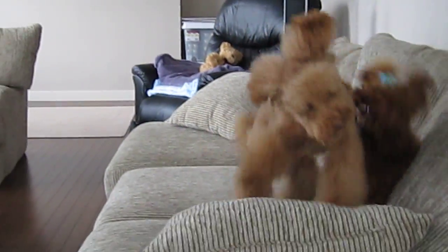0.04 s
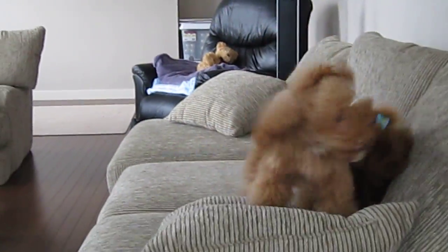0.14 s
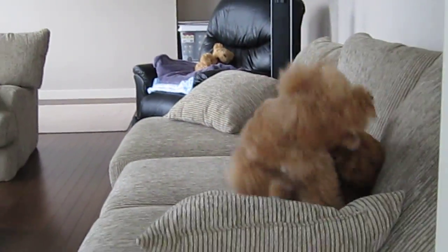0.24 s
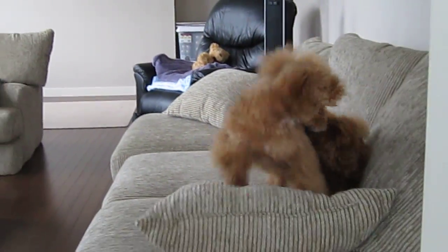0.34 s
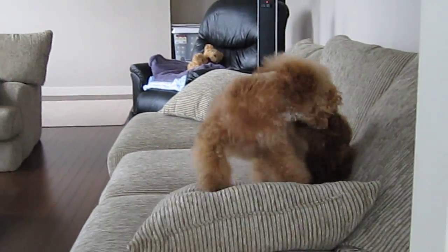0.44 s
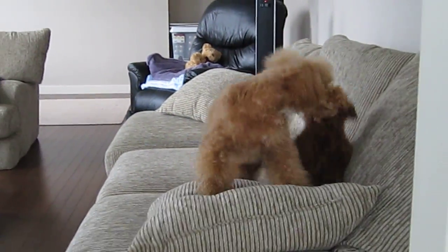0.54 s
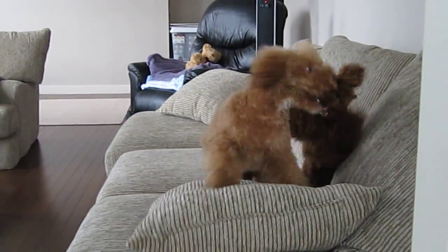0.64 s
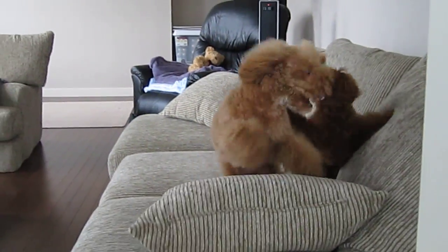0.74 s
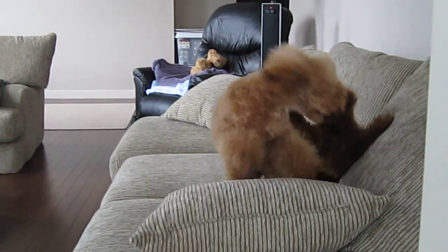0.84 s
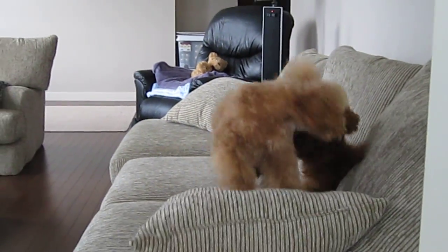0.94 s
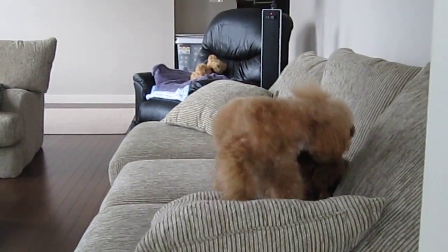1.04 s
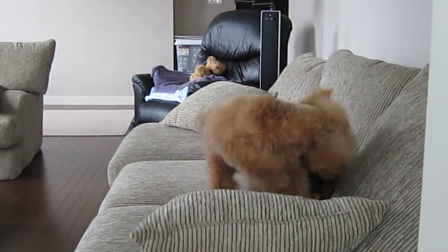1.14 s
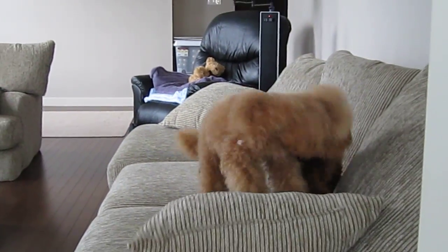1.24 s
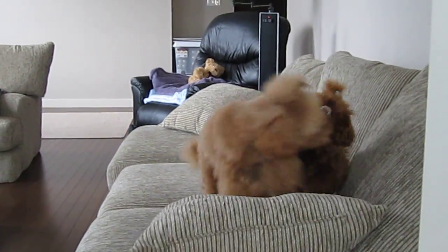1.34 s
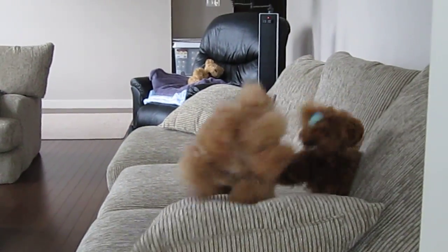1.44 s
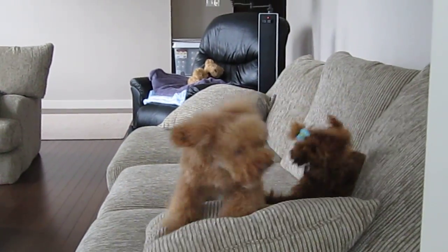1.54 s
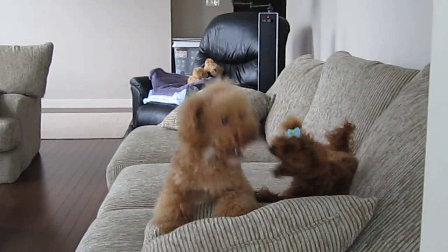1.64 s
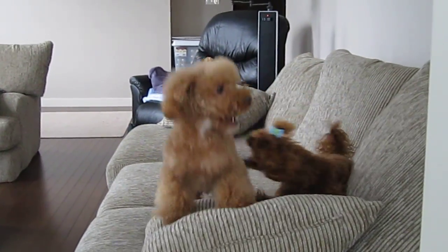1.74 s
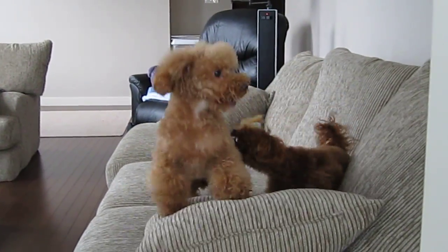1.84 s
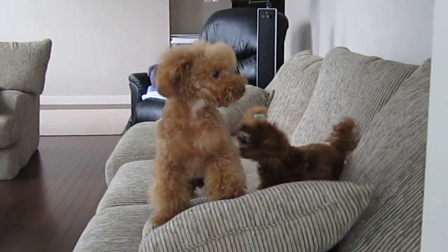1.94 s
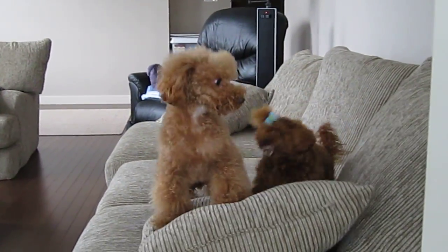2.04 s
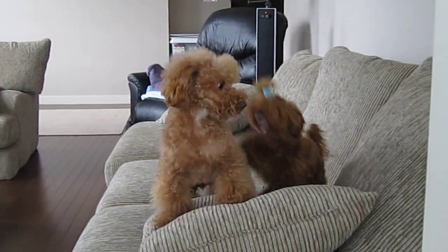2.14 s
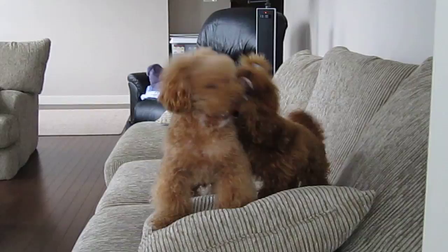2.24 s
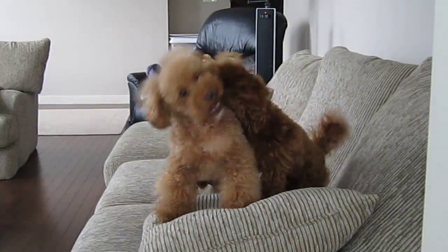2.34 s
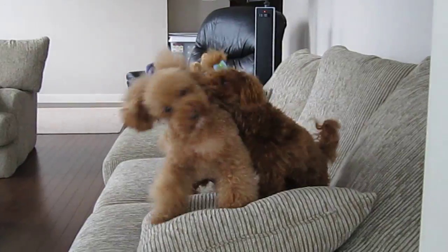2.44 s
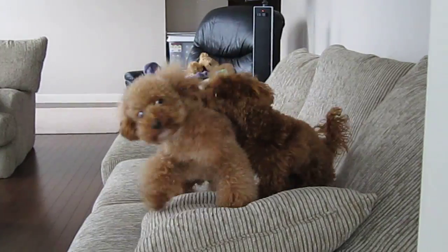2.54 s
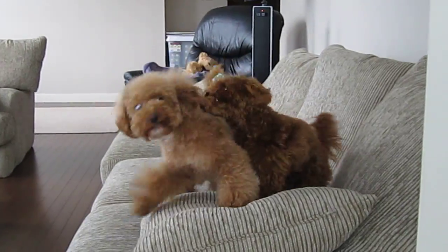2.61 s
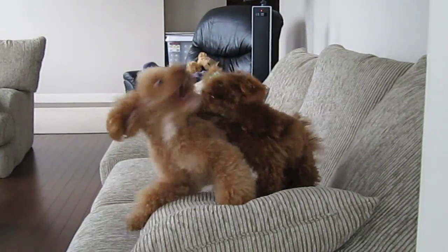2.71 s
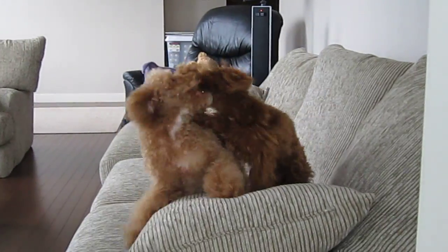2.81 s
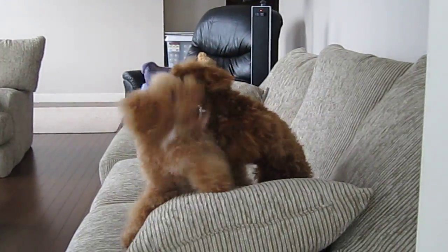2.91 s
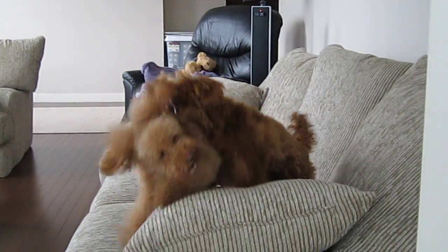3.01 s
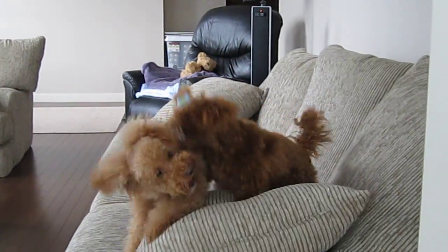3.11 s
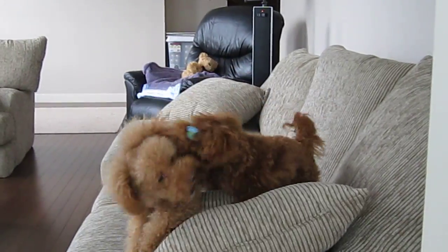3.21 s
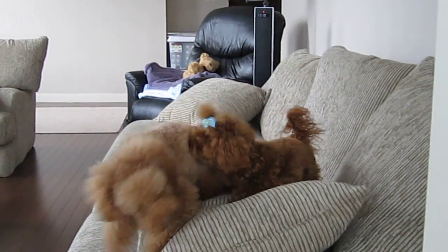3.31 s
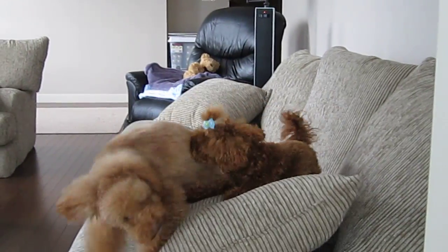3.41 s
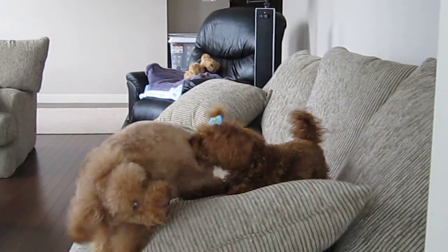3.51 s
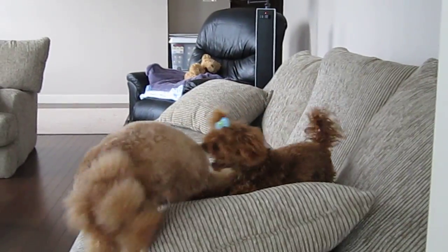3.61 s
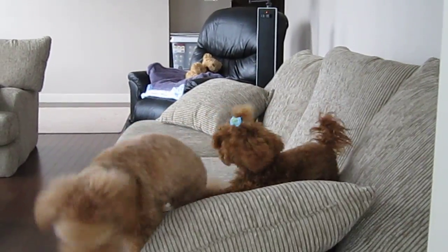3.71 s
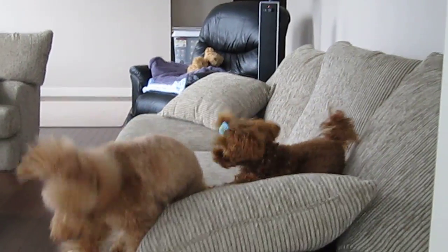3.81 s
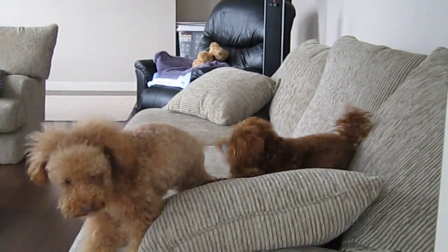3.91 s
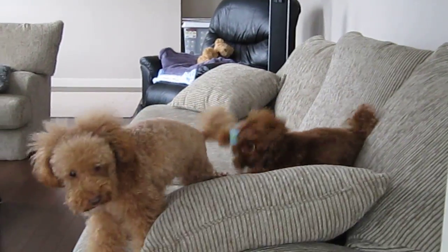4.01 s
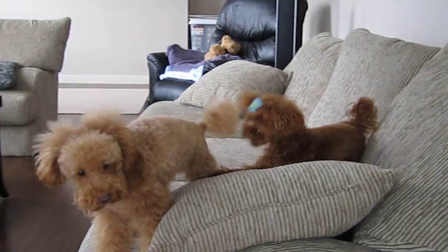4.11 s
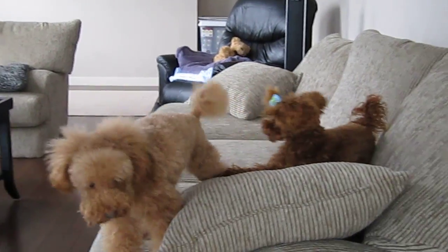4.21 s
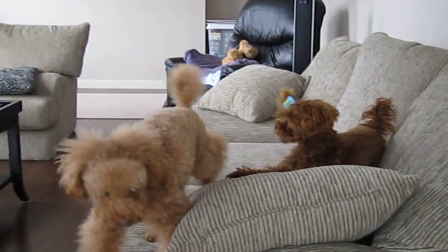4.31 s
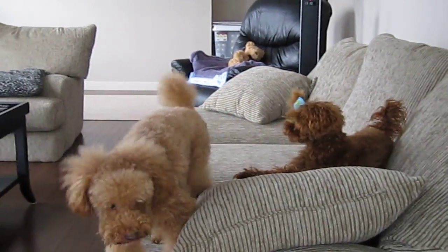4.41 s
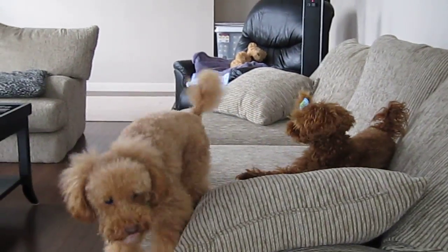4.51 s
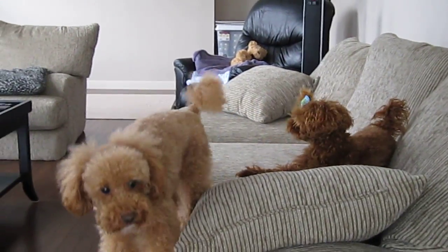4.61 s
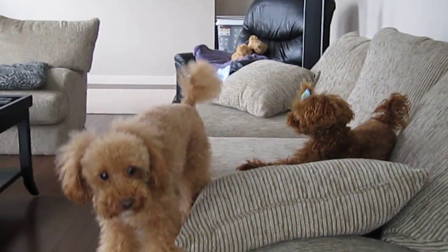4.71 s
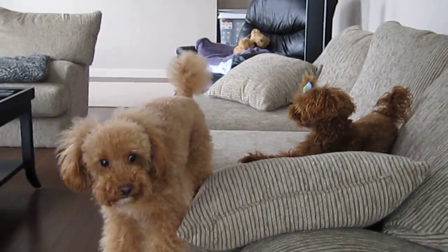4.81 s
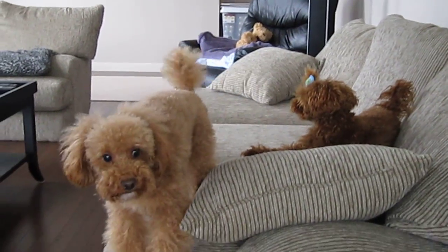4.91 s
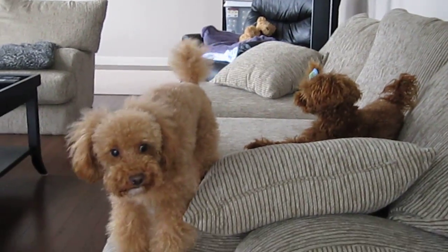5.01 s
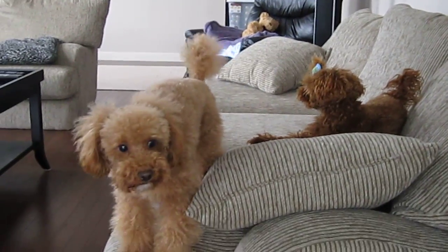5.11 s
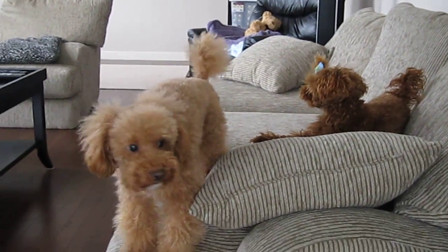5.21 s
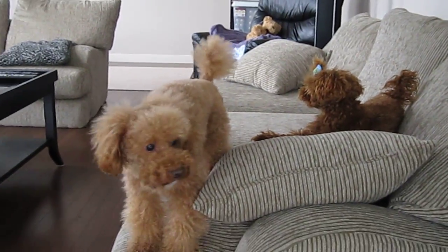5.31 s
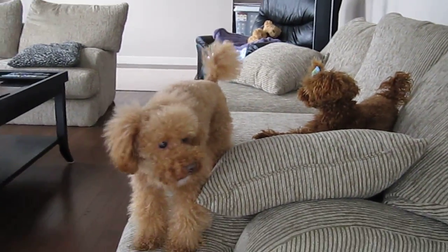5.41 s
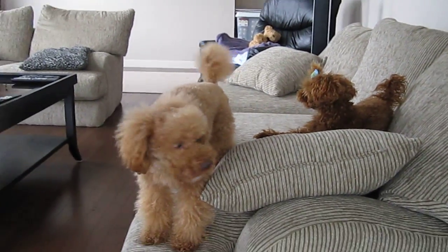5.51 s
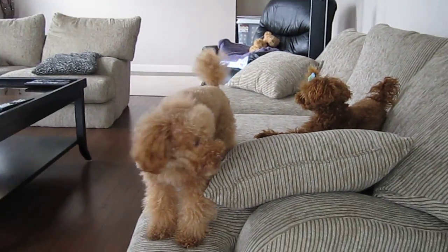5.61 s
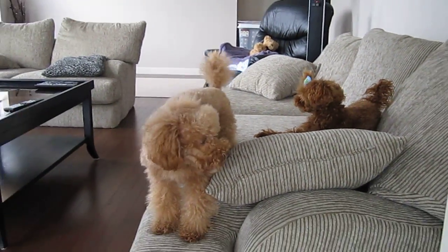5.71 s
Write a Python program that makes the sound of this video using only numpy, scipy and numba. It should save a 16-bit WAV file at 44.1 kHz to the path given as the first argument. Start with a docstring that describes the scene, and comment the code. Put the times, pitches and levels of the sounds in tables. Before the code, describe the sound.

Small dogs play-fight on a cushioned sofa in a moderately ringing living room, heard in mono from a couple of metres, over a low steady rumble. At 0 s a hard, flapping snort with a nose puff and dull thud starts abruptly. From 0.5 to 0.9 s a rough, airy growl cracks into a short higher whine near 0.8. A stronger growl runs from 1.1 to 1.5, with a tooth-like click and a short growl straight after, ending in a loud rattling snort and palate slaps around 1.6. From 2 to 2.4 come faint puffs and tiny clicks. A brief grunt at 2.5 leads to a breathy snort, then a loud raspy snarl from 3.0 to 3.4. A clipped growl and snort land at 3.65, with a trailing puff near 3.9. Sparse faint clicks follow around 4.2 to 4.5, then near quiet until weak snuffles and soft cushion bumps at 5.5 to 5.7.

```python
"""Growls in rough bursts from two small dogs play-fighting on a sofa, a couple of metres from the microphone.
Uneven pulses and air through a moving mouth make the growls, which crack into short whines. Chopped noise makes
rattling snorts and hissing nose puffs; the palate slaps. Damped noise bursts click like teeth, lips and claws
and thud on the cushions. The living room rings, over a low steady rumble of filtered noise."""
import sys
import numpy as np
from scipy import signal
from scipy.fft import rfft, irfft, next_fast_len
from scipy.io import wavfile
from scipy.ndimage import uniform_filter1d, map_coordinates
from numba import njit

SR = 44100
rng = np.random.default_rng(int(sys.argv[2]) if len(sys.argv) > 2 else 0)


def unload_wav(signal):
    """Save mono or channel-first audio to the path in sys.argv[1] as 16-bit WAV at rate SR, clipped to [-1, 1]."""
    wavfile.write(
        sys.argv[1],
        SR,
        np.round(np.clip(np.atleast_2d(signal).T, -1, 1) * 32767).astype(np.int16),
    )


N = 253575
T = np.arange(N) / SR

# Event levels below are before each source's own trim, the room and the microphone.
# growls: start [t/s], length [t/s], attack [t/s], time to bare the teeth [t/s],
#   pitch at start and end before wander [f/Hz], fundamental at start and end [level/dB],
#   mouth [level/dB], snarl [level/dB], swell of mouth and snarl [level/dB], extra effort in mid-growl [level/dB],
#   roughness at start and end [0-1], lip resonance when open [f/Hz], jaw resonance at start and end [f/Hz]
GROWLS = [ (0.509, 0.37, 0.023, 0.2, 237.6, 272.6, -35.5, -34, -34, -39.5, 1, 0.3, 0.67, 0.4, 3740, 1320, 960),
          (1.122, 0.38, 0.039, 0.045, 285, 273.1, -34, -29.5, -29.5, -39.5, -3.5, -3, 0.72, 0.9, 3000, 1180, 1340),
          (1.48, 0.173, 0.017, 0.055, 281.8, 255.4, -29, -34.5, -27.5, -27, -0.5, 1.5, 0.28, 0.2, 3260, 1240, 1460),
          (2.472, 0.1, 0.0054, 0.025, 249.8, 239, -35.5, -37, -38.5, -41.5, -5.5, 0.5, 0.35, 0.4, 2900, 1160, 1100),
          (2.986, 0.42, 0.042, 0.02, 284.2, 277.2, -31, -25, -25, -33.5, 0, 0.16, 0.6, 0.46, 3410, 1170, 1015),
          (3.631, 0.066, 0.015, 0.04, 279.4, 275, -24, -26, -25, -29.5, 1.5, -0.2, 0.19, 0.29, 4060, 1050, 980),
          ]
# shape of the mouth, one list per growl: [f/Hz], relative [level/dB]
MOUTHS = [
    [(190, -21), (330, 0), (446, -0.5), (625, -8.5), (947, -4), (1030, -9.5), (1750, -8.5), (2100, -11),
     (2600, -17), (3380, -64), (5720, -120)],
    [(190, -45), (330, -11.5), (458, 3.5), (625, -6), (776, -8.5), (853, -8), (955, -9.5), (1430, -11.5),
     (2600, -14), (3380, -56), (5720, -120)],
    [(190, -57), (330, -27), (454, -2.5), (659, -7.5), (803, 0.5), (1080, -13), (1550, -1.5), (2600, -13.5),
     (3380, -59), (5720, -120)],
    [(190, -33), (330, 4.5), (636, -5), (700, 1), (1460, -9.5), (1990, -9.5), (2600, -9), (3380, -50),
     (5720, -120)],
    [(190, -36), (330, 3.5), (363, -15), (470, -3), (615, -7.5), (1130, -4.5), (1550, -12.5), (1890, -3.5),
     (2230, -13), (2600, -13.5), (3380, -55), (5720, -120)],
    [(190, -19), (330, -1), (535, -8.5), (594, -1.5), (796, -5), (1650, -11), (2190, -21), (2600, -23),
     (3380, -44), (5720, -120)],
]
# upper resonances of each growl behind the bared teeth: [f/Hz], relative [level/dB]
SNARLS = [
    [(1350, -38), (2300, -7.5), (3730, 0), (5160, -1.5), (5570, -1.5), (7360, -14.5), (9810, -18),
     (14000, -33)],
    [(1350, -50.5), (2300, 3), (2480, 0), (2890, -4.5), (3700, -2.5), (5120, -14.5), (7310, -19),
     (10300, -18.5), (14000, -29)],
    [(1350, -50), (2300, -5), (2950, -5.5), (4080, -4), (4540, -1.5), (11000, -18.5), (14000, -25)],
    [(1350, -44), (2300, -13), (2890, -5), (3540, -18), (4900, -8.5), (5740, -18), (7040, -16),
     (10200, -14.5), (14000, -25)],
    [(1350, -37), (2300, -6), (2890, 2), (3070, -6.5), (3700, -0.5), (5010, -6), (6240, -5.5),
     (7480, -21.5), (10300, -19.5), (14000, -29)],
    [(1350, -32), (2300, -15), (2680, 4), (3360, -23), (4180, -25), (5050, 3.5), (6930, -21), (9520, -17),
     (12700, -27), (14000, -56)],
]
# growl cracking up into a whine: start [t/s], length [t/s], pitch [f/Hz], [level/dB], fade by the end [level/dB]
WHINES = [(0.518, 0.032, 463.4, -36.5, -1), (0.799, 0.091, 464.5, -28, 6.5)]
# snorts: start [t/s], length [t/s], attack [t/s], [level/dB], fade by the end [level/dB], throat [f/Hz]
SNORTS = [ (0.0, 0.06, 0.0012, -24.5, 4.5, 2040), (0.841, 0.028, 0.02, -35, 2, 1860),
          (1.583, 0.079, 0.015, -23, 12, 1790), (2.248, 0.011, 0.003, -46.5, 0.5, 1360),
          (2.273, 0.028, 0.016, -42.5, 1, 1390), (2.583, 0.12, 0.026, -36, 0, 1890),
          (3.694, 0.067, 0.006, -32, 1.5, 1800), (5.489, 0.047, 0.0092, -45.5, -1.5, 2060),
          (5.559, 0.066, 0.0068, -38, 3.5, 2000), (5.648, 0.061, 0.008, -49.5, 2.5, 1990), ]
# body of air inside the muzzle: [f/Hz], relative [level/dB]
MUZZLE = [(100, -8), (250, -4.5), (450, -1), (850, 2.5), (1400, -0.5), (2000, 0.5), (2600, 2), (4200, -2.5),
          (6000, -10), (9000, -30), (15000, -59)]
# hardest flaps of the palate: [t/s], peak [level/dB]
SLAPS = [(0.0056, -10), (0.0343, -9), (1.603, -13.5), (1.6158, -14.5), (1.6506, -14), (1.6637, -19),
         (3.703, -31), (3.7175, -15), (5.565, -37)]
# puffs through the nose: start [t/s], length [t/s], attack [t/s], [level/dB], fade by the end [level/dB]
PUFFS = [ (0.0, 0.058, 0.00079, -30, 5.5), (0.834, 0.16, 0.072, -50.5, 2.5), (1.496, 0.078, 0.058, -30, 28),
         (1.606, 0.067, 0.015, -40, -4), (1.995, 0.033, 0.021, -50, 0), (2.04, 0.068, 0.008, -59, 2),
         (2.569, 0.1, 0.045, -32, 9), (3.133, 0.14, 0.1, -40.5, 10), (3.662, 0.12, 0.073, -39, 11),
         (3.916, 0.13, 0.069, -43, 4.5), ]
# hiss of the nostrils: [f/Hz], relative [level/dB]
NOSE = [(1500, -30.5), (2500, 1), (4200, 3.5), (6300, 1.5), (8000, 0.5), (10000, -1), (12000, -2),
        (15500, -6)]
# clicks of teeth, lips and claws: [t/s], peak [level/dB], centre [f/Hz]
CLICKS = [(1.444, -21, 2300), (2.1091, -26.5, 6400), (2.1252, -39, 2580), (2.219, -41, 6860),
          (2.2522, -34.5, 2540), (2.402, -43.5, 2030), (4.184, -40, 3520), (4.265, -40, 1960),
          (4.2829, -37.5, 4230), (4.4463, -35.5, 4670), (4.487, -42.5, 3300), (5.4375, -43, 1970),
          (5.5304, -41, 2000)]
# thuds on the cushions: [t/s], peak [level/dB], bounce [f/Hz]
PAWS = [(0.009, -28.5, 124.6), (0.037, -35.5, 127), (1.54, -29, 180), (1.629, -31, 57), (2.63, -37, 133),
        (3.708, -36, 67.3), (5.648, -38.5, 142), (5.673, -39.5, 137)]
# padding of the sofa: [f/Hz], relative [level/dB]
CUSHION = [(25, 14), (50, -6.5), (150, -10), (220, -2.5), (400, -25), (1500, -45)]
# what walls and furniture stress or cancel: centre [f/Hz], width [f/Hz], gain [level/dB]
NOOK = [(250, 29, 0.5), (464, 51, 0.5), (600, 66, -6), (783, 29, 1.5), (866, 45, -1), (975, 98, 2),
        (1074, 7.3, 3.5), (1300, 63, 2.5), (1488, 42, 2.5), (1546, 29, 3.5), (2260, 250, -2)]
# decay of the living room: [f/Hz], time to fall 60 dB [t/s]
ROOM_DECAY = [(150, 0.51), (500, 0.47), (1000, 0.65), (2000, 0.68), (5000, 0.61), (10000, 0.33),
              (15000, 0.25)]
# steady rumble: [f/Hz], relative [level/dB]
RUMBLE = [(13, -36), (22, 6), (44, -8.5), (76, -6), (102, -12), (138, -2.5), (233, -12.5), (324, -16.5),
          (351, -10.5), (382, -18.5), (660, -21), (845, -21.5), (997, -23.5), (1980, -29.5), (15500, -42.5)]
# response of the microphone: [f/Hz], gain [level/dB]
MICROPHONE = [(20, -9.5), (45, 0), (10500, 1.5), (13000, -2.5), (15700, -8)]

RUMBLE_DB = -49.5  # rms ahead of the microphone
TOP_HZ = 15750  # band limit of the microphone
ONSET_DB = 17  # voices and breaths start this far under their full level
VOICE_RELEASE_S = 0.0069  # time constant as the folds stop
LIPS_SHUT_DB, LIPS_SHUT_DROP = 8.5, 0.47  # closed lips muffle the snarl and lower its resonance by this share
JAW_ARCH = 0.15  # the jaw opens widest in mid-growl and lifts its resonance by this share
JAW_WANDER, JAW_WANDER_PER_S = 0.063, 21  # it also works at random: share of its resonance, moves a second
THROAT_SAG = 0.057  # the throat resonance sinks by this share through a snort
WHINE_MUTES_DB = 10  # the fundamental gives way while the folds hold the higher note
PUFF_MUTES_DB = 3.5  # air let out through the nose is missing at the teeth


def growl(row, mouth, snarl):
    """Slack vocal folds beat unevenly; each closure sends a pulse and a burst of air through the mouth."""
    jitter, drift = 0.15, 0.03  # shares of the pitch at full roughness
    flutter_db, doubling_db, surge_db, quiver_db = 5, 1.0, 1.86, 2.05
    tone_db, mouth_db, snarl_db = -0.66, -1, -3.0  # trims
    mouth_air, snarl_air, closing = 1.28, 3.2, 0.89  # air per roughness; decay of air within a cycle
    jaw_mix, lip_mix = 0.43, 0.62
    (start, length, attack, baring, start_hz, end_hz, low_start_db, low_end_db, mid_db, high_db, swell_db, arch_db,
     rough_start, rough_end, lip_hz, jaw_start_hz, jaw_end_hz) = row
    t, progress, gate = envelope(length, attack, VOICE_RELEASE_S)

    def glide(first, last):
        """Move evenly through the growl."""
        return first + (last - first) * progress

    rough = np.clip(glide(rough_start, rough_end), 0, 1)
    shut = np.cos(np.pi / 2 * np.minimum(t / baring, 1)) ** 2
    arch = np.sin(np.pi * progress) ** 2
    jaw_motion = 1 + JAW_ARCH * arch + JAW_WANDER * wobble(JAW_WANDER_PER_S, t)
    jaw_hz = glide(jaw_start_hz, jaw_end_hz) * jaw_motion

    push = rough * wobble(30, t)  # unsteady effort lifts loudness and pitch together
    pitch = glide(start_hz, end_hz) * (1 + drift * push + jitter * rough * wobble(300, t))
    cycles = np.cumsum(pitch) / SR
    pulses = unit(np.diff(np.floor(cycles), prepend=0))
    breath = unit(rng.standard_normal(len(t)) * np.exp(-closing * (cycles % 1)))
    flutter = amp(flutter_db * rough * np.tanh(wobble(229.65, t)))  # loose throat tissue shakes the flow
    flutter *= amp(doubling_db * np.cos(np.pi * cycles))  # strong and weak beats alternate

    def flow(share):
        """Mix pulses with a share of turbulent air."""
        share = np.clip(share, 0, .97)
        return flutter * (np.sqrt(1 - share) * pulses + np.sqrt(share) * breath)

    tone = steady(flutter * np.sin(2 * np.pi * cycles))
    tone *= amp(glide(low_start_db, low_end_db) + tone_db - WHINE_MUTES_DB * during(WHINES, start + t))

    body = shaped(flow(mouth_air * rough), mouth)
    jaw_ring = resonate(body, jaw_hz, 230.0)  # the jaw moves the main resonance
    body = steady(unit(body) + jaw_mix * unit(jaw_ring))

    edge = shaped(flow(snarl_air * rough), snarl)  # a larger share of air in the treble
    lip_ring = steady(resonate(edge, lip_hz * (1 - LIPS_SHUT_DROP * shut), 790.0))
    edge = steady(unit(edge) + lip_mix * unit(lip_ring))
    muffle_db = LIPS_SHUT_DB * shut + PUFF_MUTES_DB * during(PUFFS, start + t)
    edge *= amp(quiver_db * wobble(50.1, t) - muffle_db)  # the lips quiver

    upper = amp(mid_db + mouth_db) * body + amp(high_db + snarl_db) * edge
    voice = tone + amp(swell_db * (progress - .5)) * upper
    return start, gate * amp(arch_db * arch + surge_db * push) * voice


def whine(row, attack=0.021, release=0.0046, level_db=-1, octave_db=-4.5, jitter=0.056, flutter_db=2):
    """The folds briefly jump to a cleaner, higher note with its octave."""
    start, length, pitch, db, fade_db = row
    t, _, gate = envelope(length, attack, release, fade_db)
    phase = 2 * np.pi * np.cumsum(pitch * (1 + jitter * wobble(248, t))) / SR
    note = unit(np.sin(phase) + amp(octave_db) * np.sin(2 * phase))
    return start, gate * amp(db + level_db + flutter_db * wobble(149, t)) * note


def snort(row, release=0.02, level_db=-1.0, focus=1.1, leak=0.78):
    """A hard rattling breath rings one throat resonance inside the muzzle."""
    start, length, attack, db, fade_db, throat_hz = row
    t, progress, gate = envelope(length, attack, release, fade_db)
    rattle = flaps(t, rate=91, scatter=.35, closing=6.4, size_db=1)
    flow = rng.standard_normal(len(t)) * (leak + rattle)
    air = shaped(flow, MUZZLE)
    ring = resonate(air, throat_hz * (1 + THROAT_SAG * (.5 - progress)), 256.0)
    return start, gate * amp(db + level_db) * steady(unit(air) + focus * unit(ring))


def slaps(t60=0.014, ring_hz=1990.0, crack_db=-7):
    """The palate snaps open: a crack through the nose that rings the throat."""
    out, t = np.zeros(N), T[:SR // 20]
    for s, db in SLAPS:
        burst = rng.standard_normal(len(t)) * amp(-60 * t / t60)
        ring = resonate(burst, np.full(len(t), ring_hz), 340.0)
        slap = unit(ring) + amp(crack_db) * unit(shaped(burst, NOSE))
        add(out, s, amp(db) * slap / np.abs(slap).max())
    return out


def puff(row, release=0.006, level_db=2.5, leak=0.48, low_db=-11):
    """Air hisses through the nostrils, with a little of the muzzle's hollow tone."""
    start, length, attack, db, fade_db = row
    t, _, gate = envelope(length, attack, release, fade_db)
    # the palate's rattle grows and fades with the force of the puff
    rattle = gate * flaps(t, rate=65, scatter=0.15, closing=7.7, size_db=2)
    flow = rng.standard_normal(len(t)) * (leak + rattle)
    hiss = unit(shaped(flow, NOSE))
    hollow = unit(shaped(flow, MUZZLE))
    return start, gate * amp(db + level_db) * steady(hiss + amp(low_db) * hollow)


def flaps(t, rate, scatter, closing, size_db):
    """Airflow chopped by the soft palate: sharp openings of random size at an uneven rate in Hz."""
    cycles = rng.random() + np.cumsum(rate * np.exp(scatter * wobble(120, t))) / SR
    sizes = amp(size_db * (2 * rng.random(size=512) - 3))
    return np.exp(-closing * (cycles % 1)) * np.take(sizes, cycles.astype(int), mode="wrap")


def clicks(t60=0.004, damping=0.36):
    """Small hard contacts, each a heavily damped tick; damping is its width as a share of its centre."""
    out, t = np.zeros(N), T[:SR // 20]
    for s, db, hz in CLICKS:
        burst = rng.standard_normal(len(t)) * amp(-60 * t / t60)
        tick = resonate(burst, np.full(len(t), float(hz)), damping * hz)
        add(out, s, amp(db) * tick / np.abs(tick).max())
    return out


def paws(level_db=-1, t60=0.12, width_hz=20.0):
    """Soft, dull landings, each bouncing the cushion at its own low note."""
    out, t = np.zeros(N), T[:SR // 4]
    for s, db, hz in PAWS:
        push = shaped(rng.standard_normal(len(t)) * amp(-60 * t / t60), CUSHION)
        thud = resonate(push, np.full(len(t), float(hz)), width_hz)
        add(out, s, amp(db + level_db) * thud / np.abs(thud).max())
    return out


def room(x, wet_db, gap=0.003):
    """Direct sound plus a decaying noise tail for the room, drawn anew at each call; gap in s."""
    hz, t, z = signal.stft(rng.standard_normal(SR * 3 // 4), SR, nperseg=256)
    decay = amp(-60 * t / along(ROOM_DECAY, hz)[:, None])
    tail = signal.istft(z * decay, SR, nperseg=256)[1]
    tail *= 1 - np.exp(-(T[:len(tail)] / gap) ** 2)  # reflections follow the direct sound
    answer = signal.fftconvolve(x, tail / np.linalg.norm(tail))
    answer = amp(wet_db) * shaped(answer, [(250, 1.0), (800, 3.0), (2000, -2), (12000, 0)])
    add(answer, 0, x)
    return answer


def nook(x):
    """Walls and furniture near the sofa stress or cancel narrow bands."""
    return coloured(x, lambda f: sum(db / (1 + (2 * (f - hz) / width) ** 2) for hz, width, db in NOOK))


def low_rumble():
    """Steady noise, weighted to the low end, under the whole scene."""
    return amp(RUMBLE_DB) * unit(shaped(rng.standard_normal(N), RUMBLE))


def amp(db):
    """Decibels to gain."""
    return 10 ** (np.asarray(db) / 20)


def unit(x):
    """Scale to rms 1."""
    return x / np.sqrt(np.mean(x ** 2) + 1e-20)


def steady(x):
    """Hold the rms near 1 while keeping the fast flutter."""
    return x / np.sqrt(np.abs(uniform_filter1d(x * x, size=1500)) + 1e-12)


def along(points, hz):
    """Read (Hz, value) points on a log axis."""
    f, v = np.transpose(points)
    return np.interp(np.log(hz + 1), np.log(f), v)


def wobble(rate, t):
    """A smooth random curve of rms 1 over the times t, rate knots a second."""
    return unit(map_coordinates(rng.standard_normal(8192), [t * rate], mode="wrap"))


def coloured(x, gain_db):
    """Causal (minimum-phase) filter with a dB gain given as a function of frequency."""
    m = 2 * next_fast_len(len(x) // 2 + 4096)
    cepstrum = irfft(np.log(amp(gain_db(np.fft.rfftfreq(m, 1 / SR))) + 1e-6))
    cepstrum[1:m // 2] *= 2  # fold the cepstrum onto positive times
    cepstrum[m // 2 + 1:] = 0
    return irfft(rfft(x, m) * np.exp(rfft(cepstrum)))[:len(x)]


def shaped(x, spectrum):
    """Pass x through a fixed body of (Hz, dB) points."""
    return coloured(x, lambda hz: along(spectrum, hz))


@njit
def resonate(x, hz, width_hz):
    """A band-pass resonance whose centre can move."""
    y = np.zeros(len(x))
    r = np.exp(-np.pi * width_hz / SR)
    for i in range(2, len(x)):
        drive = (1 - r) * (x[i] - x[i - 2])
        y[i] = drive + 2 * r * np.cos(2 * np.pi * hz[i] / SR) * y[i - 1] - r * r * y[i - 2]
    return y


def opening(t, duration):
    """Go from 0 to 1 in the given time, fast at first and easing in."""
    return 1 - (1 - np.clip(t / duration, 0, 1)) ** 2


def envelope(length, attack, release, fade_db=0):
    """Attack, a hold that fades as the air runs out, release. Returns times, progress 0-1 and gain."""
    t = T[:int((length + .1) * SR)]
    spent = np.clip((t - attack) / max(length - attack, 1e-3), 0, 1)
    db = ONSET_DB * (opening(t, attack) - 1) - fade_db * spent
    return t, np.minimum(t / length, 1), amp(db) * np.exp(-np.maximum(t - length, 0) / release)


def during(events, s):
    """1 at the times s at which one of the events sounds, else 0, with soft edges."""
    active = sum(1.0 * ((s > start) & (s < start + length)) for start, length, *_ in events)
    return uniform_filter1d(active, size=900)


def add(track, s, x):
    """Mix x into the track at time s."""
    part = track[max(0, round(s * SR)):][:len(x)]
    part += x[:len(part)]


def scene():
    """The dogs on the sofa, their contacts and the steady rumble."""
    dogs = np.zeros(N)
    calls = [growl(row, mouth, snarl) for row, mouth, snarl in zip(GROWLS, MOUTHS, SNARLS)]
    calls += [whine(row) for row in WHINES]
    calls += [(0, slaps())]
    calls += [snort(row) for row in SNORTS]
    calls += [puff(row) for row in PUFFS]
    for s, sound in calls:
        add(dogs, s, room(sound, wet_db=-6.5))
    contacts = room(clicks() + paws(), wet_db=-5.5)[:N]
    return (nook(dogs) + contacts + low_rumble())[None]


def record(dry):
    """The microphone softens both ends and keeps nothing above its band limit."""
    m = next_fast_len(N + SR // 4)
    hz = np.fft.rfftfreq(m, 1 / SR)
    response = amp(along(MICROPHONE, hz)) * (hz < TOP_HZ)
    return irfft(rfft(dry, m) * response, m)[:, :N]


dry = scene()
out = record(dry)
unload_wav(out)
```